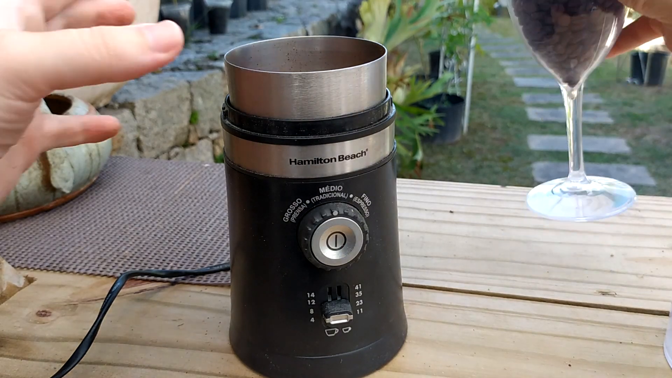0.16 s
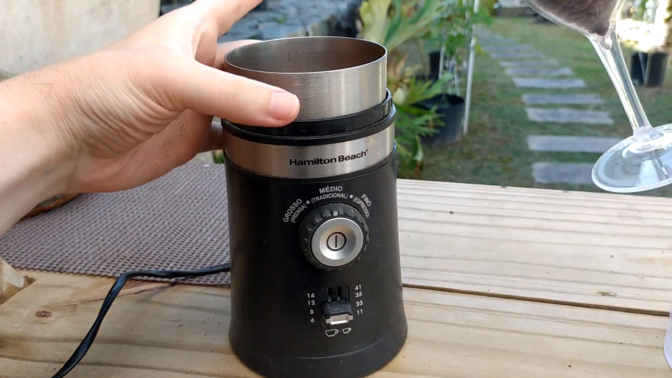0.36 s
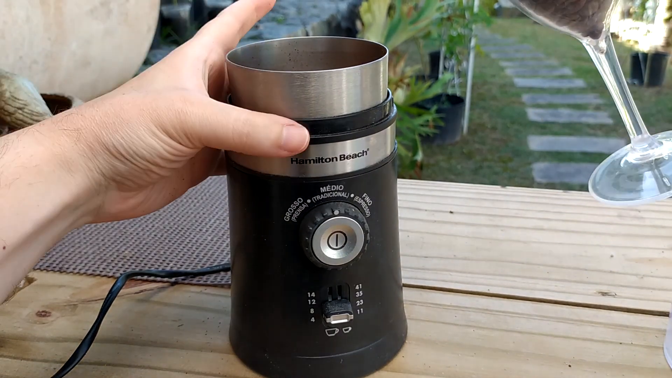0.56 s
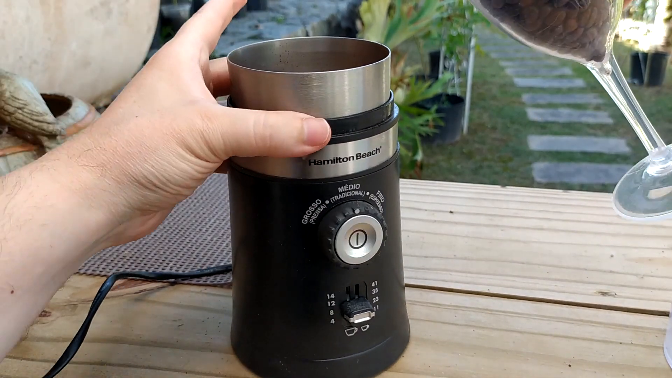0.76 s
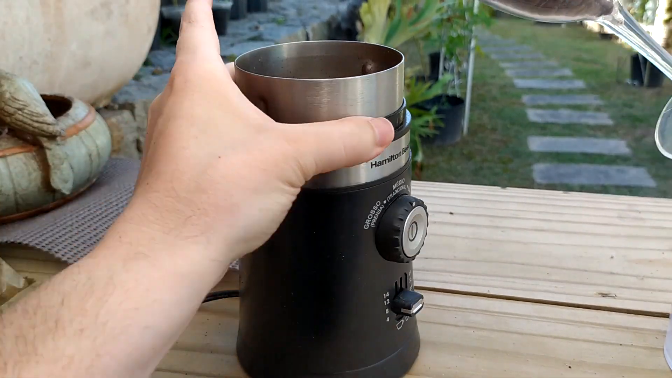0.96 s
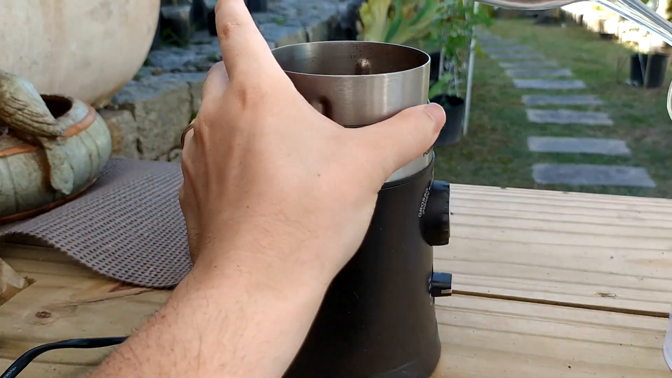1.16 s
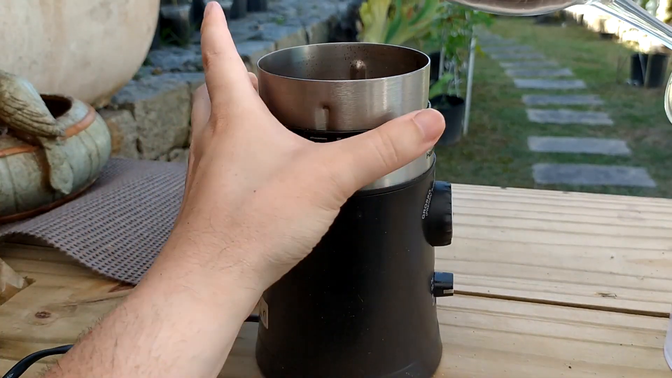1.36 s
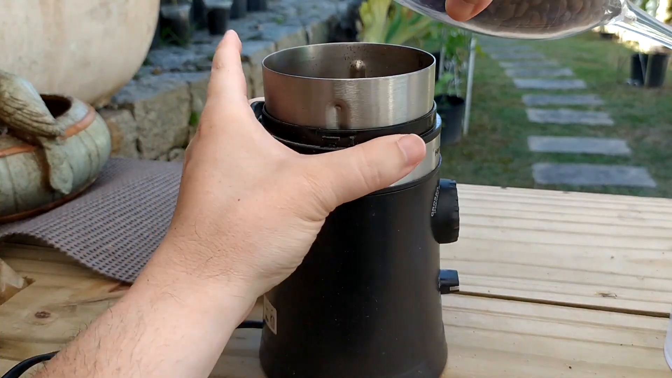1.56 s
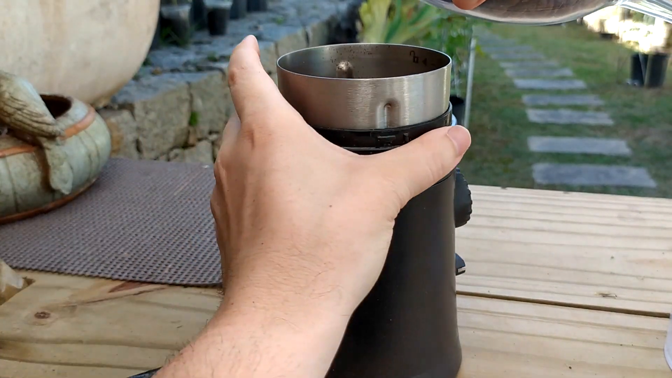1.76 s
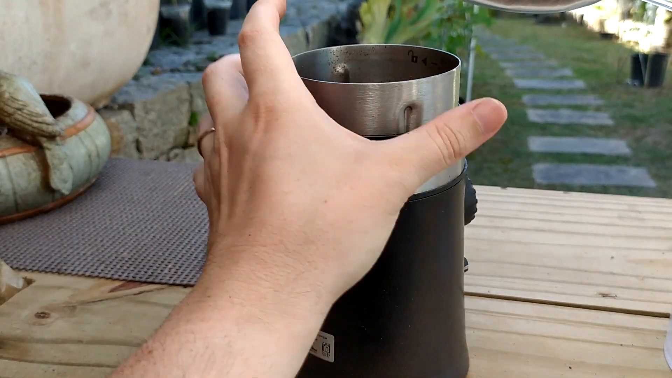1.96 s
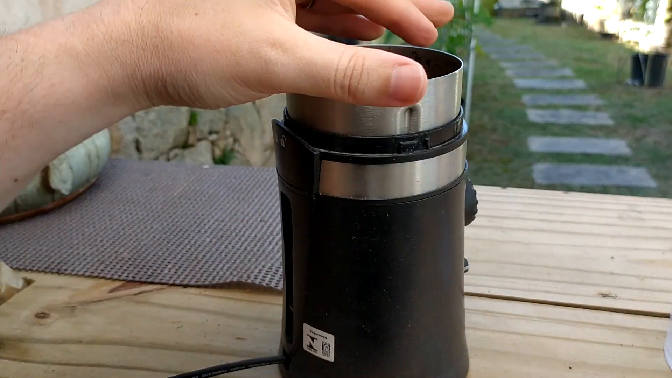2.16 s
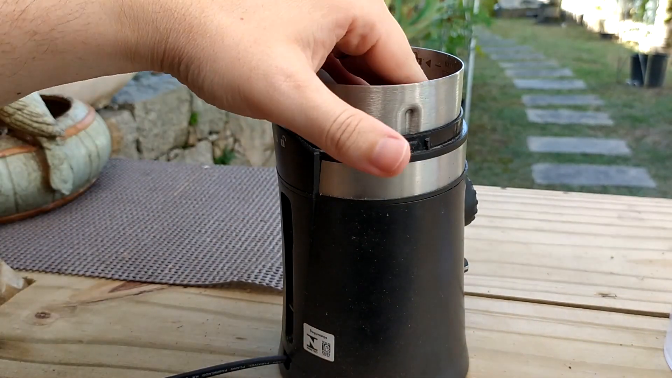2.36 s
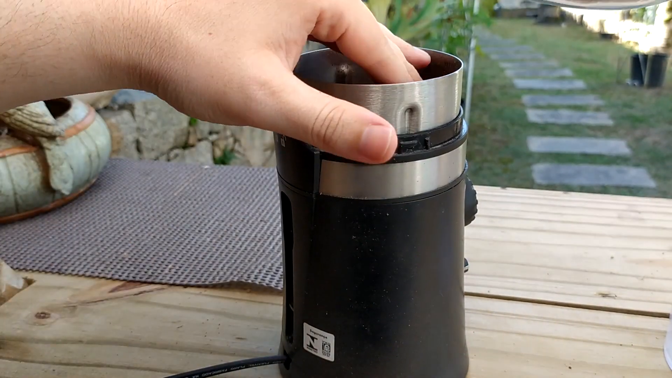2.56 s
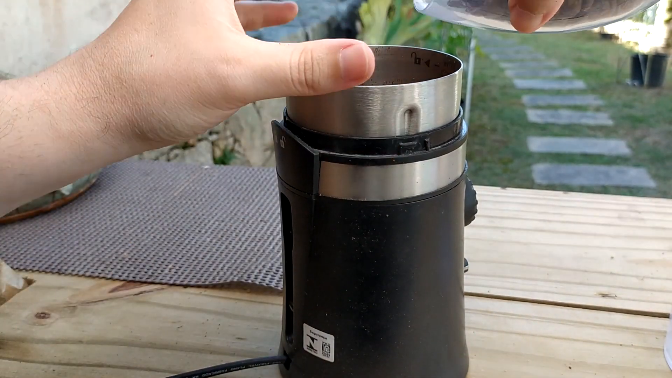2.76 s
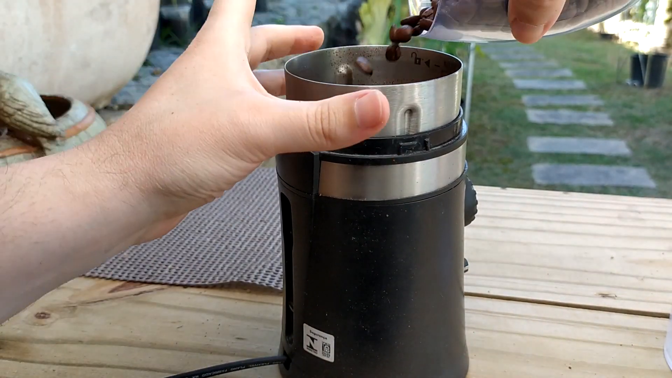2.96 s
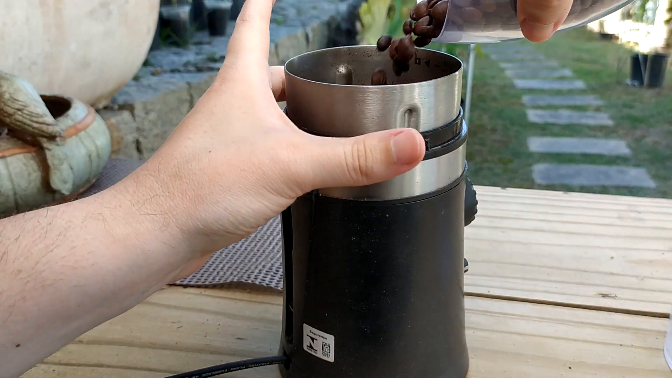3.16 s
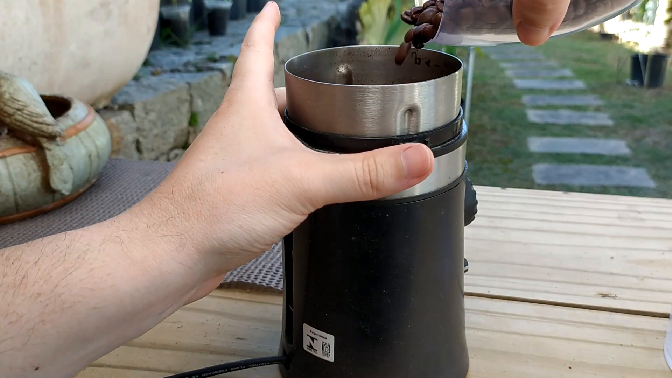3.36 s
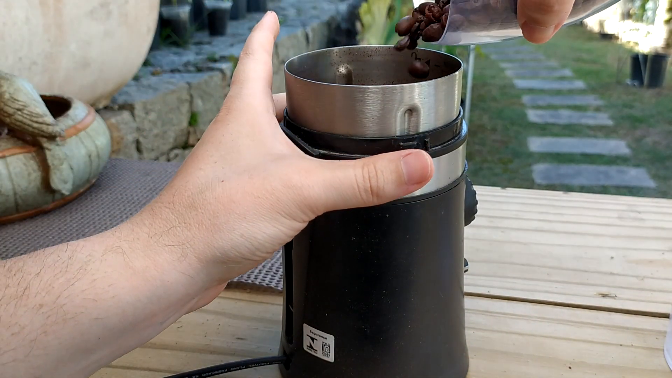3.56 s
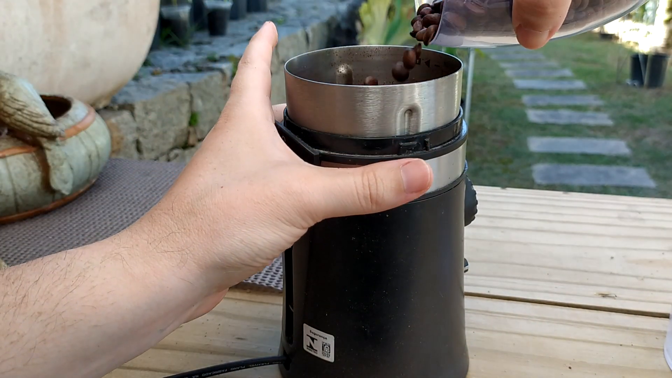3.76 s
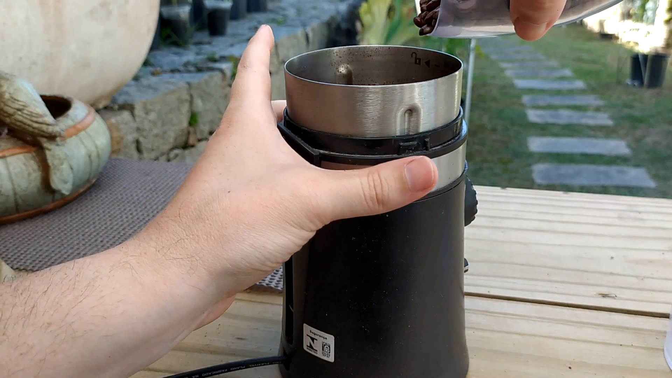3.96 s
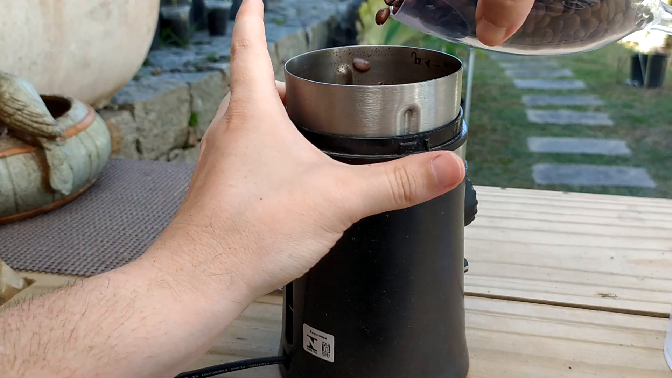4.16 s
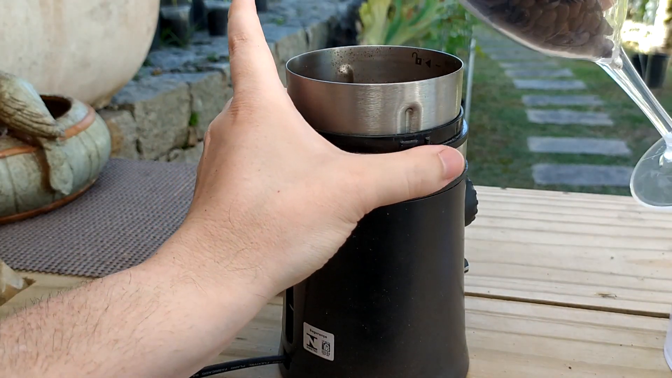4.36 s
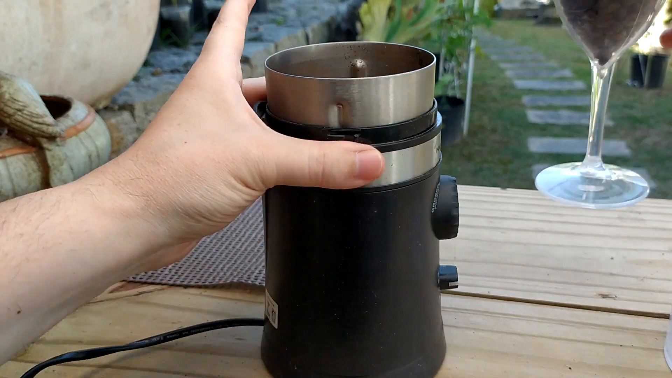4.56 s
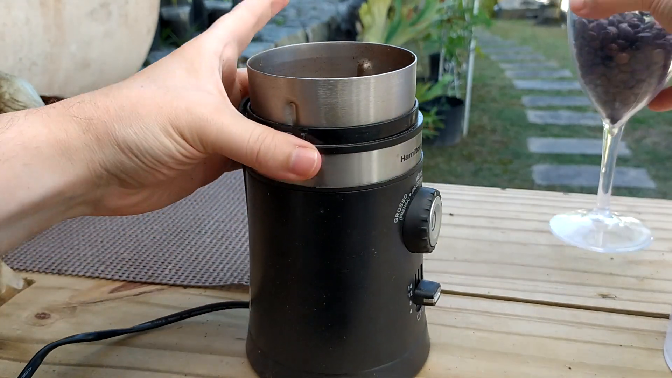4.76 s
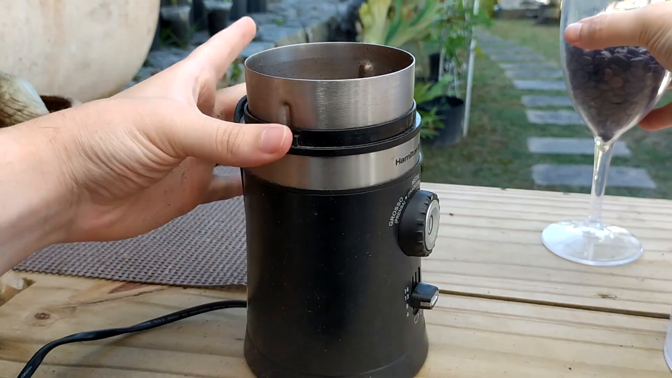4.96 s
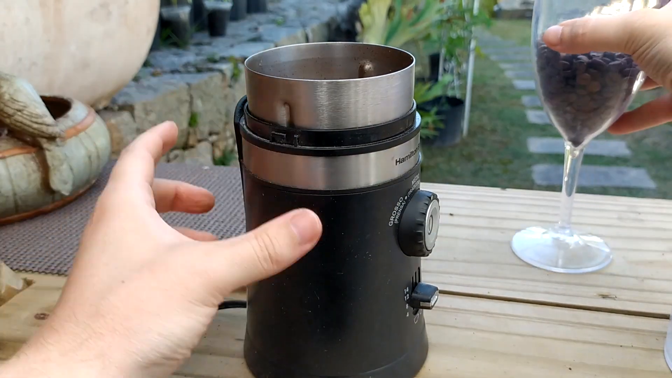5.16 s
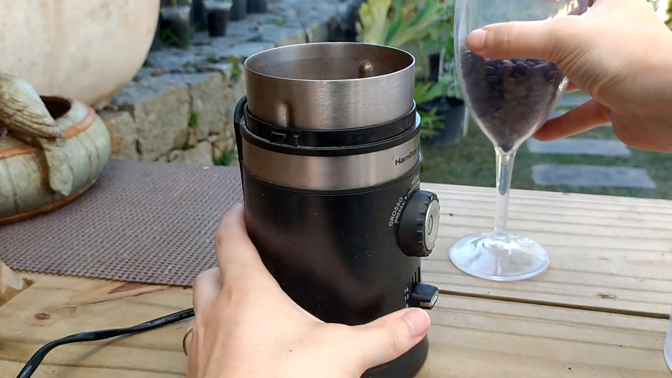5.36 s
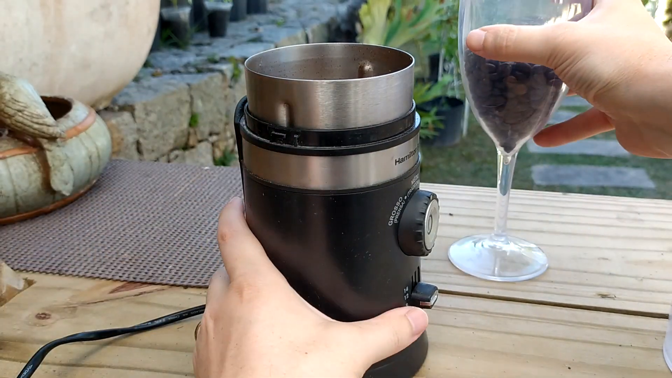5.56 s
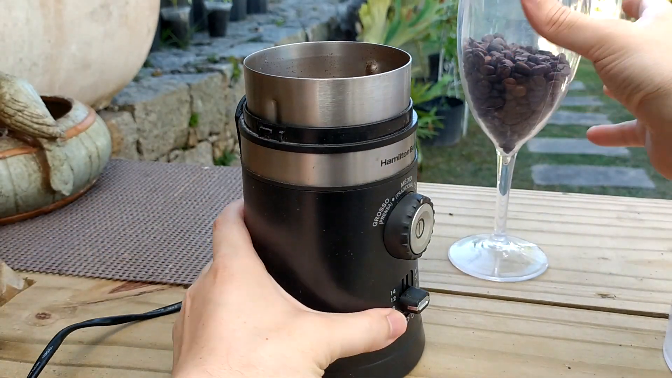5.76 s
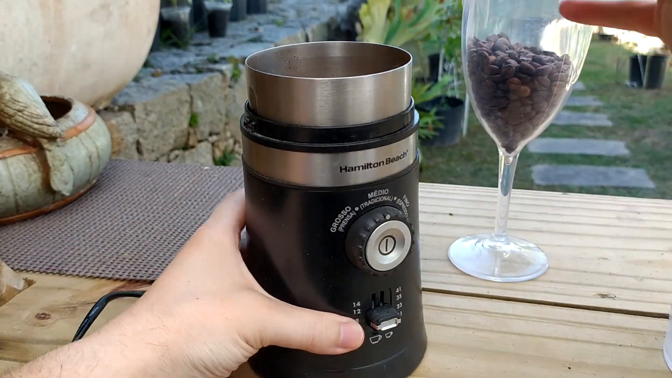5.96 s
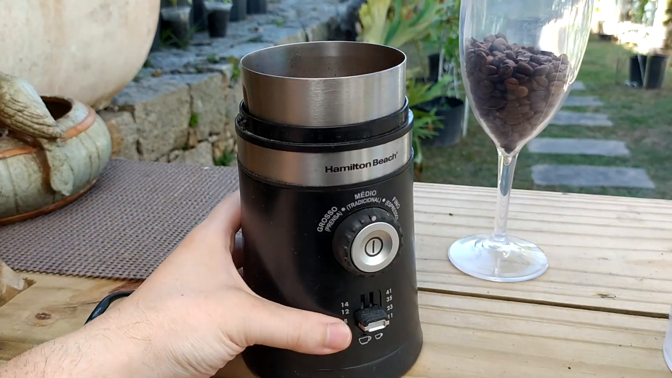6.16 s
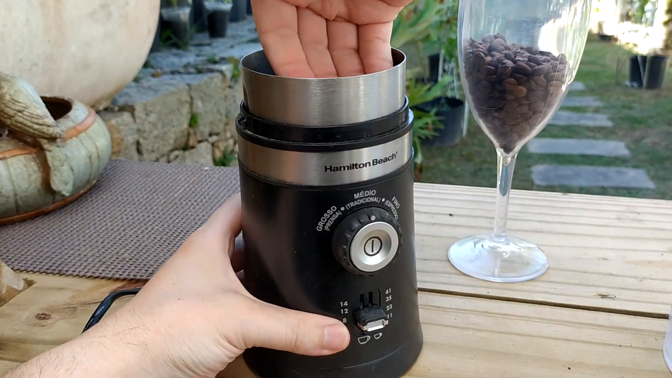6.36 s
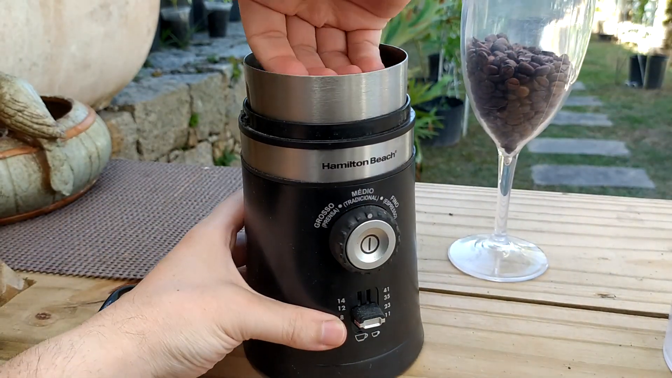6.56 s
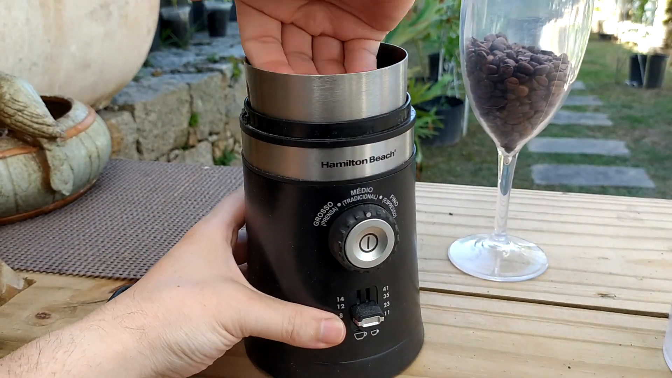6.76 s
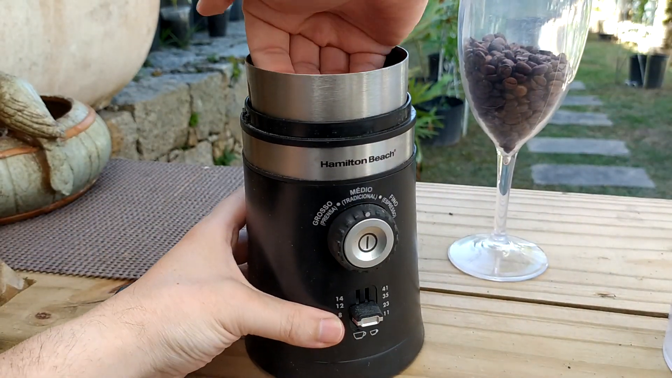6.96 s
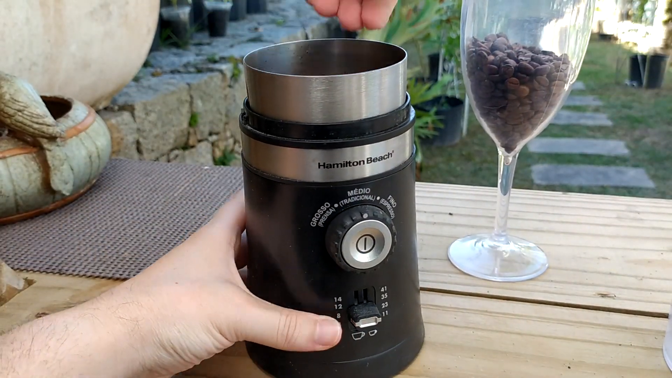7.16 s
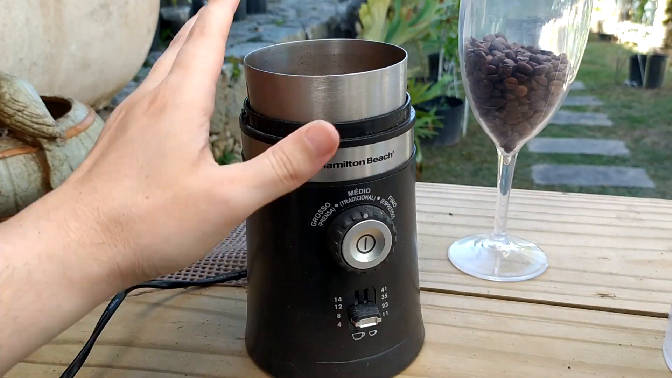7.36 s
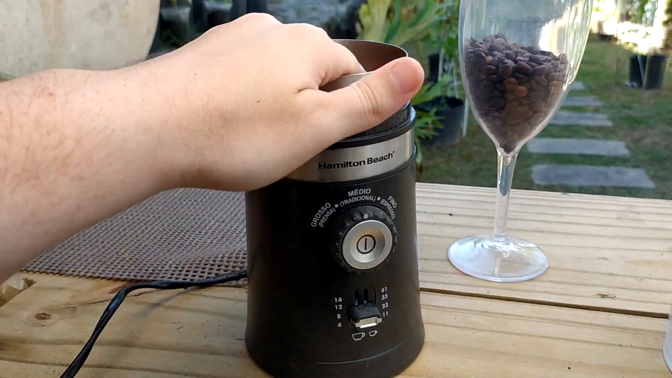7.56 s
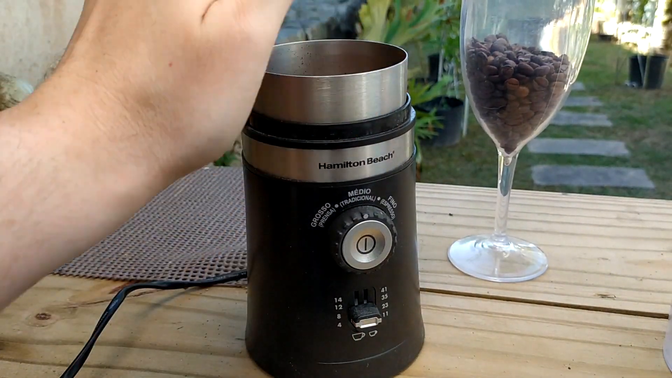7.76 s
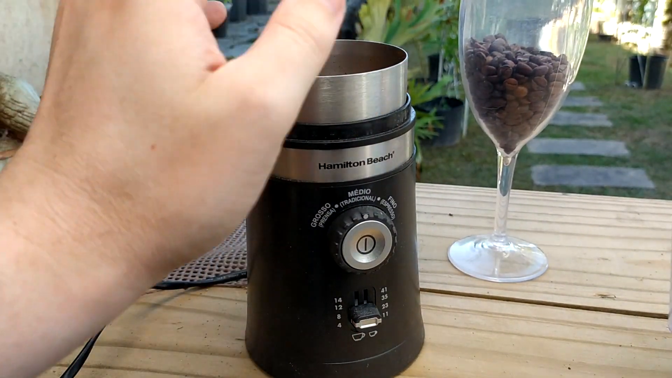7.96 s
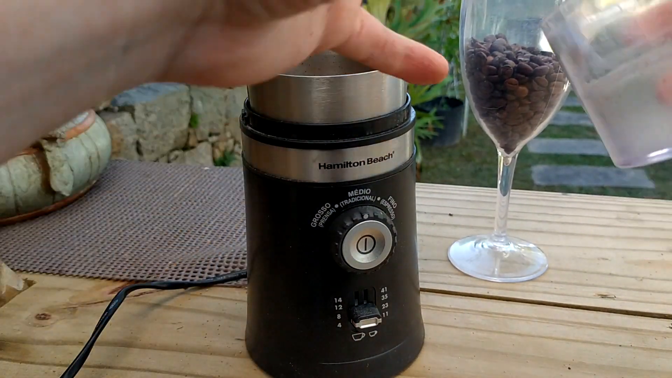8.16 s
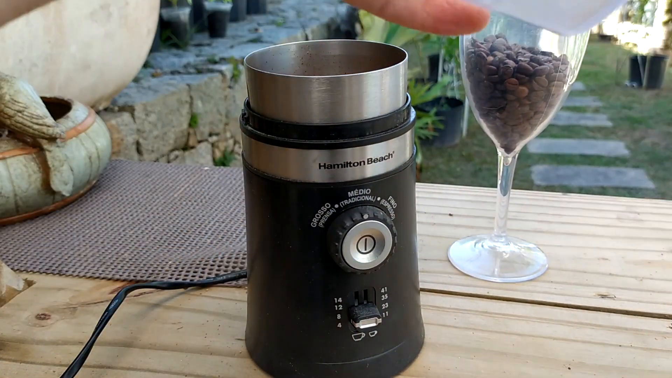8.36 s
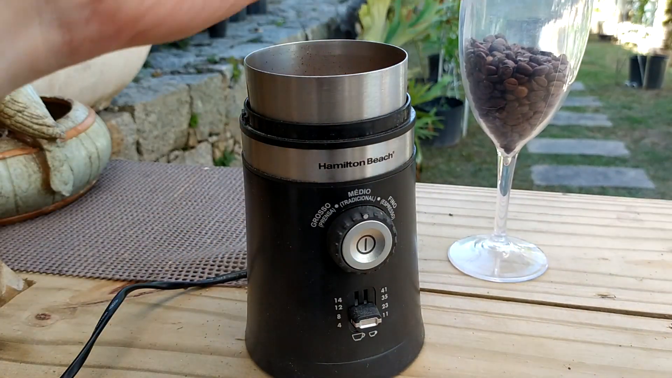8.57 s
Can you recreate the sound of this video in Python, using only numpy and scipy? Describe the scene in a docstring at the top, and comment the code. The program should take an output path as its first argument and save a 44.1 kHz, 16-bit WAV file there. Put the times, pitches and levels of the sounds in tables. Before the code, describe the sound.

Close outdoor stereo pickup with soft garden air and a faint low wind. A coffee grinder is turned on a wooden table with small knocks, rumbling slips and sharp ticks. Beans then pour into its steel bowl in a bright, dense patter that thins to single clacks. The remaining beans rattle loudly back in the glass, the base knocks, then light slides, finger rustles and one late sharp click.

```python
"""A light wind blows throughout over garden air, with two gusts leaning left: both are filtered noise.
Meanwhile a hand turns and slides a coffee grinder on a plank table: tiny slips and knocks ring planks and housing.
Beans pour from a glass into its steel bowl and slide back in the glass: clouds of short noisy hits,
with louder single beans on top. Skin brushing steel and plastic rustles as many softer hits."""
import sys
import numpy as np
from scipy import signal
from scipy.fft import rfft, irfft
from scipy.io import wavfile
from scipy.ndimage import uniform_filter1d

SR = 44100
rng = np.random.default_rng(int(sys.argv[2]) if len(sys.argv) > 2 else 0)


def wrap_up_sound(samples):
    """Save the sound to the file named by the first command line argument, as 16-bit audio."""
    columns = np.atleast_2d(samples).T
    # keep every value between -1 and 1, then stretch to whole-number steps
    tamed = np.clip(columns, -1, 1)
    steps = np.round(tamed * 32767).astype(np.int16)
    wavfile.write(sys.argv[1], SR, steps)


N = 379260   # length in samples

# colour of the garden air: f/Hz, level/dB per Hz (only the shape counts)
AIR_COLOUR = [(35, -29), (60, -19.5), (108, -1), (472, -4.5), (889, -13), (3310, -22), (7000, -21.5),
              (9270, -16.5), (14500, -57)]
# how alike left and right are in the garden air: f/Hz, likeness (1 = the same)
AIR_LIKENESS = [(60, 0.42), (300, 0.79), (1000, 0.056), (3000, 0.013)]
# gusts of wind: strongest t/s, rise/s, fall/s, level over the breeze/dB
WIND_GUSTS = [(0.27, 0.57, 0.13, 13), (5.83, 0.039, 0.29, 11)]

# ways the planks ring: f/Hz, level/dB, time to fade by 60 dB/s
PLANK_MODES = [(101.8, -14, 0.18), (232, -5.5, 0.12), (325, -4.5, 0.059), (369, -3, 0.088),
               (476, -1.5, 0.024), (607, -2.5, 0.0089)]
# ways the grinder's housing rings: f/Hz, level/dB, time to fade by 60 dB/s
HOUSING_MODES = [(542, -0.5, 0.032), (1100, 2.5, 0.015), (1271, 0.5, 0.018), (1630, 1, 0.012),
                 (1860, -1, 0.027), (2080, -0.5, 0.022), (2413, 2, 0.017), (2850, 1, 0.0045),
                 (3666, -5, 0.029), (4740, 4, 0.0058)]
# base and glass knock the planks: t/s, housing strength/dB, plank strength/dB, housing pitch f/Hz
PLANK_KNOCKS = [(0.54, -36.5, -33, 1290), (0.6, -28, -29.5, 2500), (0.687, -39.5, -29, 1400),
                (0.815, -41, -39, 2000), (0.769, -32, -34, 1900), (0.837, -40, -27, 2000),
                (0.859, -27.5, -33, 1290), (0.887, -23, -24.5, 1260), (1.12, -20.5, -22, 2090),
                (1.207, -8, -13.5, 2300), (1.646, -31, -24.5, 1850), (1.886, -32.5, -28, 1480),
                (1.982, -16.5, -23.5, 1460), (2.341, -37, -37, 1910), (4.244, -36, -33.5, 1100),
                (4.61, -26, -14, 1820), (4.659, -19.5, -21.5, 1630), (4.693, -20.5, -19, 1130),
                (4.736, -25.5, -19.5, 2080), (4.794, -22, -22.5, 1190), (4.907, -8.5, -16, 1800),
                (5.579, -39.5, -50, 1100), (6.588, -38, -40, 1200), (6.627, -22, -26, 600),
                (6.69, -37, -32, 700), (7.022, -33.5, -43, 900), (7.156, -31, -45, 1090),
                (7.596, -28, -45, 2430)]
# the grinder is turned, its weight on the planks: start t/s, end t/s, rumble strength/dB
GRINDER_TURNS = [(0.327, 0.584, -55.5), (0.583, 0.857, -43), (0.823, 1.119, -32), (1.074, 1.43, -49),
                 (1.564, 1.794, -43.5), (1.792, 2.106, -45), (2.296, 2.512, -51), (4.572, 4.908, -40.5)]
# light, smooth slides over the planks: start t/s, end t/s, rasp strength/dB, rasp pitch f/Hz
GRINDER_SLIDES = [(4.316, 4.58, -47, 1900), (4.927, 5.155, -50, 1960), (5.125, 5.401, -42, 1900),
                  (5.621, 6.065, -44, 1390), (8.135, 8.503, -61, 1420)]
# fingers brush steel, beans and housing: start t/s, end t/s, rustle strength/dB
FINGER_TOUCHES = [(1.6, 1.814, -46.5), (5.383, 5.544, -49.5), (6.366, 6.437, -40.5), (6.605, 6.647, -34),
                  (6.786, 6.824, -35), (6.82, 6.895, -52), (6.926, 7.123, -49), (7.174, 7.2, -34.5),
                  (7.58, 7.698, -48), (8.291, 8.477, -46.5)]
# colour of skin on steel and plastic: f/Hz, level/dB per Hz (only the shape counts)
SKIN_COLOUR = [(1470, -24), (2500, -7), (4290, -11), (9780, 0), (16300, -29.5)]

# colour of a bean on the steel bowl: f/Hz, level/dB per Hz (only the shape counts)
STEEL_COLOUR = [(700, -29.5), (3060, -13.5), (4000, -14), (5280, -12), (6100, -8), (9320, -3),
                (15500, -21.5)]
# loud single beans and ticks on the steel: t/s, peak level before left-right balance/dB
LOUD_BEANS = [(0.599, -24), (1.041, -13.5), (1.057, -21), (1.2065, -7.5), (1.3037, -19), (1.474, -16.5),
              (1.513, -27.5), (1.557, -24), (1.59, -14.5), (1.6303, -23), (1.649, -17.5), (1.703, -14),
              (1.745, -21.5), (2.7657, -22.5), (2.826, -13.5), (2.8404, -7.5), (2.8759, -6.5), (2.9166, -8),
              (2.939, -11), (2.9446, -10), (2.9817, -9), (3.034, -10.5), (3.1, -20), (3.169, -10),
              (3.2049, -19), (3.228, -17), (3.348, -11.5), (3.412, -14), (3.51, -14), (3.555, -11.5),
              (3.6214, -5), (3.668, -8), (3.69, -18), (3.746, -7), (3.7648, -5), (3.8102, -7.5),
              (3.9236, -14), (3.975, -20.5), (4.017, -5.5), (4.0645, -3), (4.121, -17.5), (4.182, -20),
              (4.1953, -7), (4.215, -19.5), (4.2716, -13), (4.281, -13.5), (4.3495, -19.5), (4.4152, -14.5),
              (4.43, -17.5), (4.4516, -10.5), (4.46, -10.5), (4.487, -6.5), (4.5196, -7), (4.555, -14),
              (4.576, -4.5), (4.596, -1.5), (4.677, -12), (4.725, -2.5), (4.755, -24), (4.8199, -16.5),
              (4.8898, -18), (5.7516, -9.5), (6.427, -25.5), (6.6222, -18.5), (6.805, -17), (6.979, -31.5),
              (7.019, -28), (7.156, -26.5), (7.5924, -5.5), (7.5991, -7.5), (8.309, -22.5)]
# the stream of beans thickens at once and thins out: t/s, patter strength/dB
POUR_STREAM = [(2.83, -54), (2.845, -24), (3.07, -23), (3.27, -24), (3.38, -28.5), (3.7, -29.5),
               (3.95, -36.5), (4.3, -32), (4.34, -69)]
# beans slide back as the glass is righted, and jump as it is set down:
# start t/s, fullest t/s, end t/s, patter strength/dB
BEAN_SHIFTS = [(4.498, 4.589, 4.765, -21), (4.912, 4.932, 4.952, -21.5)]

AIR_DB, BREEZE_DB = -51, -50.5
GUST_PAN = 1.6   # dB that left stands over right, for each dB of gust

TURN_RASP_DB, TURN_RASP_HZ = -7, 1900   # rasp against rumble, and its pitch
TURN_RUSTLE_DB, TURN_RUSTLE_FOLLOWS = -21.5, 0.5   # rustle grows by half as many dB as the rumble
SLIDE_RUMBLE_DB, SLIDE_RUSTLE_DB = -3.5, 1.5   # against rasp
TOUCH_RUMBLE_DB, TOUCH_RASP_DB, TOUCH_RASP_HZ = -12, -9, 1400   # against rustle, and rasp pitch
STROKE_ATTACK, STROKE_RELEASE = 0.089, 0.21   # shares of a stroke's length
STROKE_EDGE_DB = -13   # how far below its full level a stroke starts and ends

SHIFT_SWELL_DB, SHIFT_FADE_DB_PER_S = 9, 912   # a shift swells, holds, then dies
GLASS_CUT_HZ = 12300   # heaped in the glass the beans sound duller
# a loud bean among the others comes with a clump that bounces after it
SCATTER_DB, SCATTER_FOLLOWS, SCATTER_FADE_DB_PER_S = -18.5, 0.65, 394
SILENT_DB = -110
CUTOFF_HZ = 16500   # from here up the sound is at least 70 dB down


def from_db(db):
    """Turn a level in dB into a gain."""
    return 10 ** (np.asarray(db) / 20)


def rms_one(x):
    """Scale a sound to rms 1."""
    return x / np.sqrt(np.mean(x ** 2) + 1e-20)


def at_hz(points, hz):
    """Read a curve between its points, with pitch spaced as the ear hears it (log frequency)."""
    points = np.array(points)
    return np.interp(np.log(hz), np.log(points[:, 0]), points[:, 1])


def sides(pan_db):
    """Left and right gains that put left pan_db over right."""
    return from_db([pan_db / 2, -pan_db / 2])


def drift(rate_hz):
    """Slow random wandering of spread 1, made at every 40th sample and joined by lines."""
    r = np.exp(-80 * np.pi * rate_hz / SR)
    slow = signal.lfilter([1], [1, -2 * r, r * r], rng.standard_normal(N // 40 + 2002))
    slow = rms_one(slow[2000:])   # drop the filter's start-up
    return np.interp(np.arange(N) / 40, np.arange(len(slow)), slow)


def grains(per_s, spread_db):
    """Random contacts of uneven size, as single-sample clicks; rms 1 whatever their rate."""
    sizes = from_db(spread_db * np.minimum(rng.exponential(1, N), 3.0))
    sizes = sizes * rng.choice([-1, 1], N)
    sizes = sizes / np.sqrt(uniform_filter1d(sizes ** 2, size=SR // 4))
    happens = rng.random(N) < per_s / SR
    return sizes * happens * np.sqrt(SR / per_s)


def hit_shape(colour, bright_hz, focus_db, clack_t60, tail_t60, tail_db, lumps_db):
    """One stereo contact: modes too many to count, so lumpy noise, as a quick clack and a faint tail."""
    t = np.arange(4096) / SR
    hz = np.maximum(np.fft.rfftfreq(4096, 1 / SR), 100)
    strong_modes = np.interp(hz, np.linspace(0, SR / 2, 110), rng.standard_normal(110))
    off_focus = np.minimum(abs(np.log2(hz / bright_hz)), 1)   # octaves from the brightest pitch, at most 1
    level_db = at_hz(colour, hz) + lumps_db * strong_modes - focus_db * off_focus
    fade = from_db(-60 * t / clack_t60) + from_db(tail_db - 60 * t / tail_t60)
    fade = fade * np.minimum(t / 0.0009, 1) * (1 - t / t[-1])   # the contact takes a moment
    noise = rng.standard_normal((2, 4096))
    hit = irfft(rfft(noise) * from_db(level_db)) * fade
    return hit / np.sqrt(np.sum(hit ** 2, 1, keepdims=True))


def scattered(contacts, hits):
    """Deal each contact one of the hit shapes at random."""
    dealt = rng.integers(0, len(hits), N)
    out = np.zeros((2, N))
    for k, hit in enumerate(hits):
        out += signal.oaconvolve([contacts * (dealt == k)], hit, axes=1)[:, :N]
    return out


def wind():
    """Low noise from 13 to 65 Hz, uneven in level and partly shared by left and right; gusts lean left."""
    t = np.arange(N) / SR
    gust_db = sum(np.interp(t, [s - rise, s, s + fall], [0, db, 0]) for s, rise, fall, db in WIND_GUSTS)
    low_band = signal.butter(2, [13, 65], "band", fs=SR, output="sos")
    mid, side = signal.sosfilt(low_band, rng.standard_normal((2, N)))
    gain = from_db(BREEZE_DB + gust_db + 2 * drift(8.3)) * sides(GUST_PAN * gust_db)
    return rms_one(mid + 0.38 * side * [[1], [-1]]) * gain


def banded_noise(spectrum, patchy_db):
    """Half-octave bands of stereo noise, each with its own level, flicker and likeness; rms 1."""
    out, together = 0, drift(2.0)
    edges = 45 * 2 ** np.arange(0, 9, .5)
    white = rng.standard_normal((2, 2, N))
    for k, (low, high) in enumerate(zip(edges, edges[1:])):
        band = signal.butter(2, [low, high], "band", fs=SR, output="sos")
        mid, side = signal.sosfilt(band, white[k % 2])   # neighbours use different noise
        hz = np.sqrt(low * high)
        alike = np.clip(at_hz(AIR_LIKENESS, hz), -1, 1)
        gain = from_db(at_hz(spectrum, hz) + patchy_db * (together / 2 + drift(10)))
        out = out + gain * (np.sqrt(1 + alike) * mid + np.sqrt(1 - alike) * side * [[1], [-1]])
    return rms_one(out)


def garden_air():
    """Steady outdoor air: noise in many bands that flicker a little."""
    return from_db(AIR_DB) * banded_noise(AIR_COLOUR, patchy_db=1)


def strokes():
    """Turns, slides and touches as rows: start t/s, end t/s, rumble/dB, rasp/dB, rasp f/Hz, rustle/dB."""
    rows = []
    for start, end, db in GRINDER_TURNS:
        rustle_db = TURN_RUSTLE_DB + TURN_RUSTLE_FOLLOWS * db
        rows.append((start, end, db, db + TURN_RASP_DB, TURN_RASP_HZ, rustle_db))
    for start, end, db, hz in GRINDER_SLIDES:
        rows.append((start, end, db + SLIDE_RUMBLE_DB, db, hz, db + SLIDE_RUSTLE_DB))
    for start, end, db in FINGER_TOUCHES:
        rows.append((start, end, db + TOUCH_RUMBLE_DB, db + TOUCH_RASP_DB, TOUCH_RASP_HZ, db))
    return rows


def stroked(levels_db):
    """Gain over time: each stroke sets in, holds and lets go."""
    out = np.zeros(N)
    for (start, end, *_), level_db in zip(strokes(), levels_db):
        first, last = round(start * SR), round(end * SR)
        along = np.linspace(0, 1, last - first)
        near_edge = np.maximum(1 - along / STROKE_ATTACK, 1 - (1 - along) / STROKE_RELEASE)
        out[first:last] += from_db(level_db + STROKE_EDGE_DB * np.maximum(near_edge, 0))
    r = np.exp(-1 / (0.0089 * SR))   # smooths the steps over about 9 ms
    return signal.lfilter([1 - r], [1, -r], out)


def body(modes, slips, rub_db, rub_hz, focus_db, blows_db, blows_hz, alike):
    """Slips and blows ring the same modes; a stroke or blow favours the modes near its own pitch."""
    at = [round(row[0] * SR) for row in PLANK_KNOCKS]
    t = np.arange(3000) / SR
    # a quick cluster of contacts, then loose parts settle
    settling = from_db(-60 * t / 0.012) + from_db(-13.5 - 60 * t / 0.14)
    out = np.zeros((2, N))
    for k, (hz, level_db, t60) in enumerate(modes):
        r, w = from_db(-60 / (t60 * SR)), 2 * np.pi * hz / SR
        rub_gain = stroked(rub_db - focus_db * abs(np.log2(hz / rub_hz)))
        rubbing = slips * rub_gain * np.sqrt(1 - r * r)
        blows = np.zeros(N)
        off_pitch_db = focus_db * 0.58 * abs(np.log2(hz / blows_hz))
        blows[at] = from_db(blows_db - off_pitch_db + rng.normal(0, 2.74, len(at)))
        rattle = signal.oaconvolve(blows, settling)[:N] * rng.standard_normal(N)   # new for every blow
        push = rubbing + 0.69 * blows + .1 * rattle + 1e-18
        resonator = [0, np.sin(w)], [1, -2 * r * np.cos(w), r * r]
        rung = signal.lfilter(*resonator, push) * from_db(level_db)
        # left hears it later than right, the more so the less alike they are
        lag = round((1 - np.clip(alike, 0, 1)) * SR / hz / 2 * rng.uniform(0.3, 1))
        out += (-1) ** k * np.array([np.roll(rung, lag), rung])
    return out


def handling():
    """Stick-slip of the base shakes planks and housing; skin and loose beans rustle on the steel."""
    rumble_db, rasp_db, rasp_hz, rustle_db = np.transpose(strokes())[2:]
    housing_db, plank_db, knock_hz = np.transpose(PLANK_KNOCKS)[1:]
    t = np.arange(N) / SR
    sliding = np.any([(t > row[0]) & (t < row[1]) for row in GRINDER_SLIDES], axis=0)
    rough = 1 - .45 * sliding   # light slides stick less
    judder = rough * (drift(25) + drift(7))
    slips = grains(900 / rough ** 2, spread_db=5 * rough) * from_db(1.9 * judder)
    planks = body(PLANK_MODES, slips, rumble_db, 320, 0.27, plank_db - 4.0, 280, alike=0.85)
    housing = body(HOUSING_MODES, slips, rasp_db, rasp_hz, 14.8, housing_db, knock_hz, alike=0.38)
    touches = [hit_shape(SKIN_COLOUR, 9000, 0, clack_t60=.012, tail_t60=.06, tail_db=-16, lumps_db=4)
               for _ in range(8)]
    brush = grains(900 / rough, spread_db=-0.5) * stroked(rustle_db) * from_db(2 * judder)
    return planks + housing + scattered(brush, touches)


def bean_hit(bright_hz, focus_db):
    """A bean on the steel: a short bright clack with a faint ring after it."""
    return hit_shape(STEEL_COLOUR, bright_hz, focus_db, clack_t60=.018, tail_t60=.09, tail_db=-20, lumps_db=6)


def loud_beans():
    """Loud single hits on the steel, each a new noisy clack set to its own peak."""
    out = np.zeros((2, N + SR))
    for s, peak_db in LOUD_BEANS:
        hit = bean_hit(rng.uniform(8000, 10000), focus_db=11.0)
        hit = hit / abs(hit).max(1, keepdims=True)
        first = round(s * SR)
        out[:, first:first + hit.shape[1]] += from_db(peak_db) * hit
    return out[:, :N]


def patter_db():
    """Strength of the patter: the loudest of the stream, the clump after each loud bean, and the shifts."""
    t = np.arange(N) / SR
    levels = [np.interp(t, *np.transpose(POUR_STREAM), SILENT_DB, SILENT_DB)]
    for s, peak_db in LOUD_BEANS:
        if POUR_STREAM[0][0] < s < BEAN_SHIFTS[0][2]:
            clump_db = SCATTER_DB + SCATTER_FOLLOWS * peak_db - SCATTER_FADE_DB_PER_S * (t - s)
            levels.append(np.where(t > s, clump_db, SILENT_DB))
    for start, fullest, end, level_db in BEAN_SHIFTS:
        swell_db = np.interp(t, [start, fullest], [-SHIFT_SWELL_DB, 0], SILENT_DB)
        levels.append(level_db + swell_db - SHIFT_FADE_DB_PER_S * np.maximum(t - end, 0))
    return np.maximum(np.max(levels, axis=0), SILENT_DB)


def pour(places=32):
    """Beans land in clumps all over the bowl, more often in a thicker stream; under them the heap rustles."""
    level_db = patter_db()
    per_s = np.clip(350 * from_db(.5 * (level_db + 25) + 3 * drift(12)), 60, 5000)
    hits = [bean_hit(bright_hz, focus_db=6) for bright_hz in np.geomspace(6500, 14500, places)]
    landing = grains(per_s, spread_db=2.8)
    heap = from_db(-9) * grains(10 * per_s, spread_db=3)
    patter = scattered((landing + heap) * from_db(level_db), hits)
    dulled = signal.sosfilt(signal.butter(4, GLASS_CUT_HZ, fs=SR, output="sos"), patter)
    in_bowl = np.arange(N) / SR < BEAN_SHIFTS[0][0]   # later the beans are in the glass
    return np.where(in_bowl, patter, dulled)


def scene():
    """The beans a little to the right, the handling, garden air and wind."""
    beans = (pour() + loud_beans()) * sides(-2.5)[:, None]
    return beans + handling() + garden_air() + wind()


def record(dry):
    """Peaks beyond full scale are clipped, then the top of the treble is cut."""
    low_pass = signal.cheby2(16, 70, CUTOFF_HZ, fs=SR, output="sos")
    return signal.sosfilt(low_pass, np.clip(dry, -1, 1))


dry = scene()
out = record(dry)
wrap_up_sound(out)
```